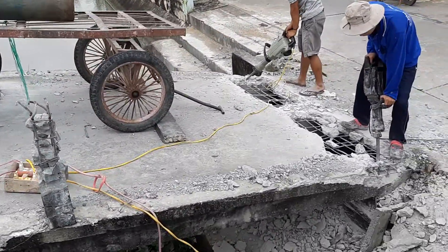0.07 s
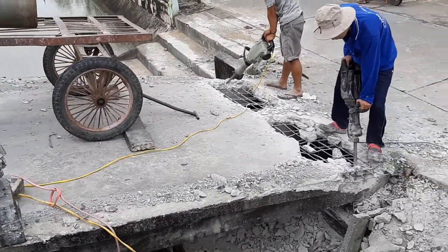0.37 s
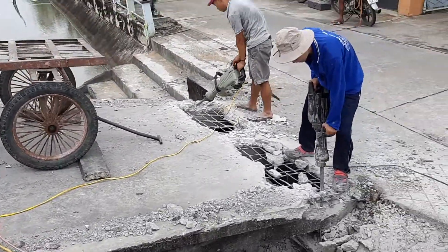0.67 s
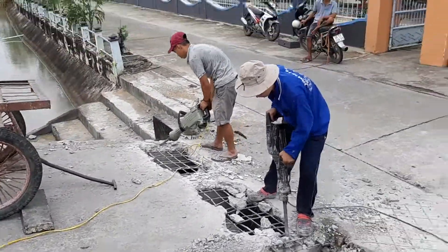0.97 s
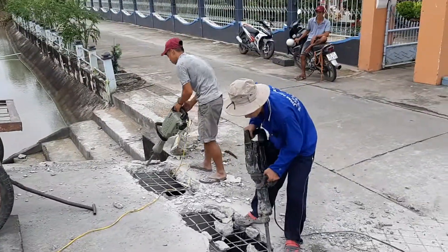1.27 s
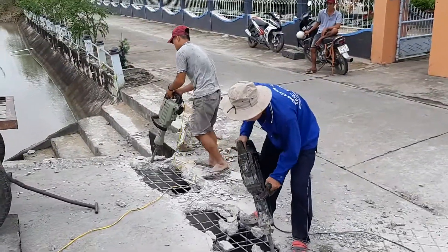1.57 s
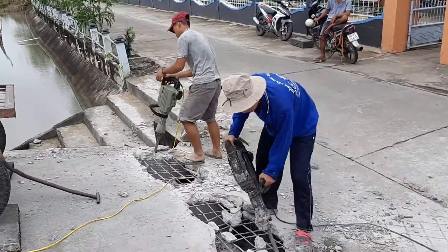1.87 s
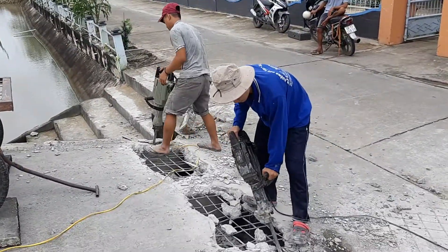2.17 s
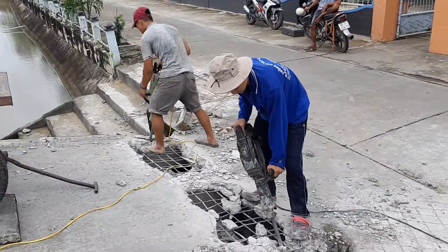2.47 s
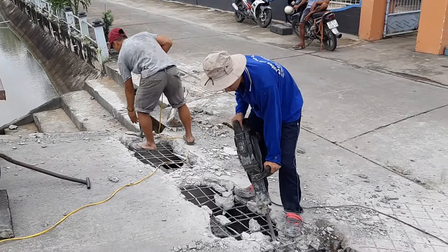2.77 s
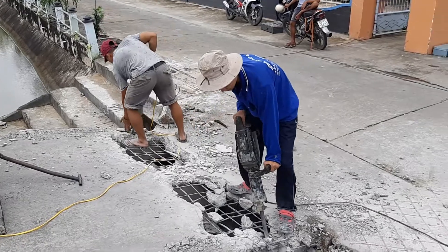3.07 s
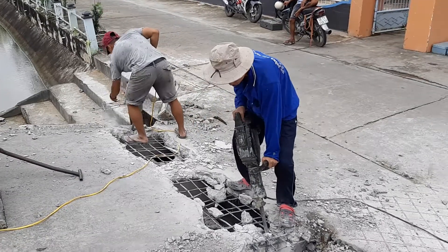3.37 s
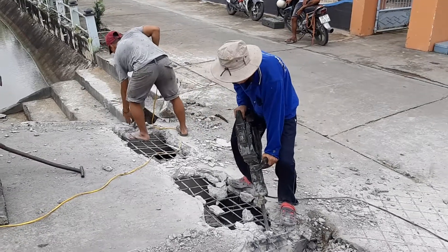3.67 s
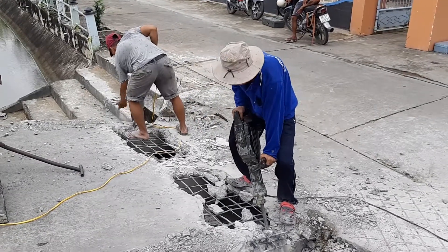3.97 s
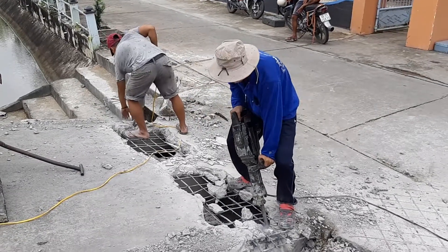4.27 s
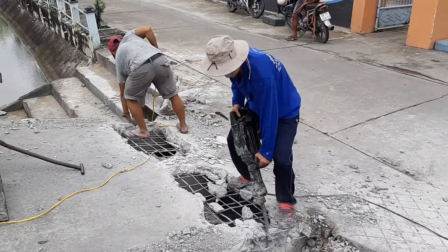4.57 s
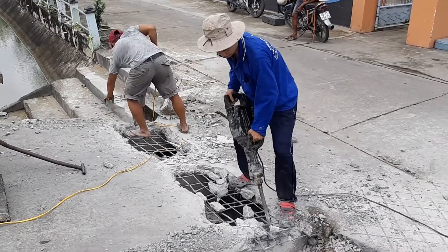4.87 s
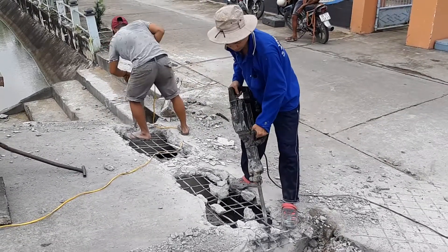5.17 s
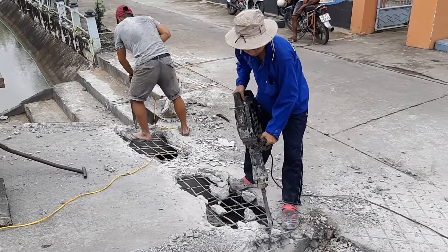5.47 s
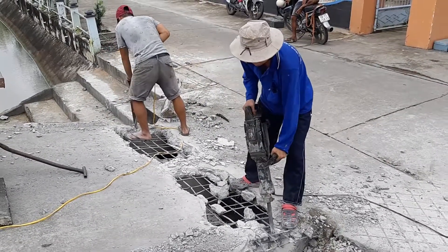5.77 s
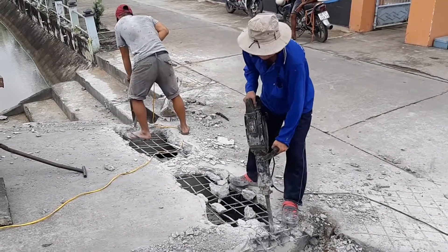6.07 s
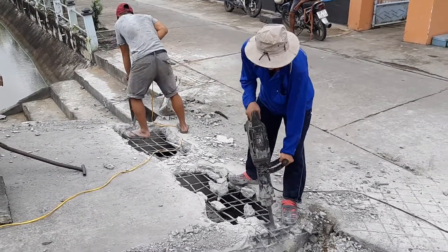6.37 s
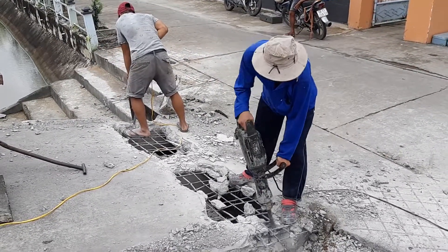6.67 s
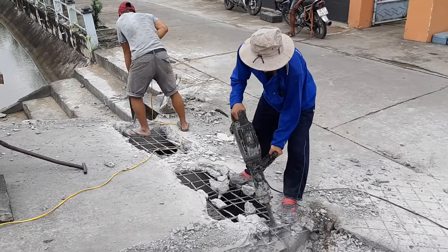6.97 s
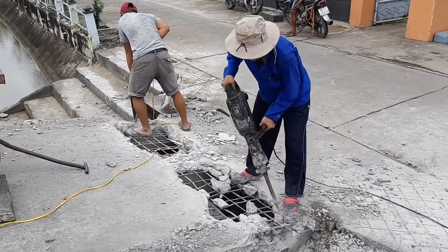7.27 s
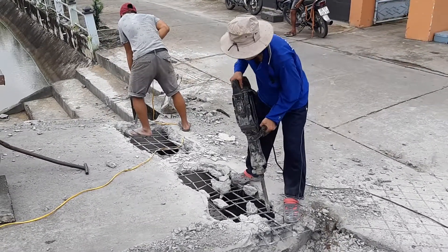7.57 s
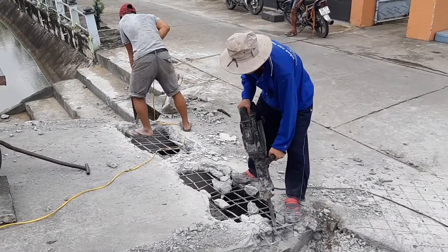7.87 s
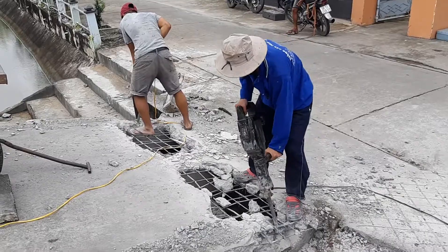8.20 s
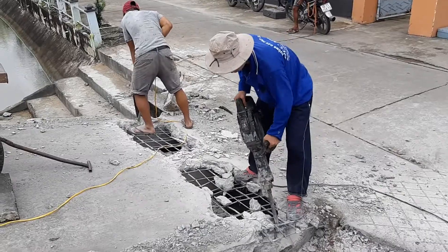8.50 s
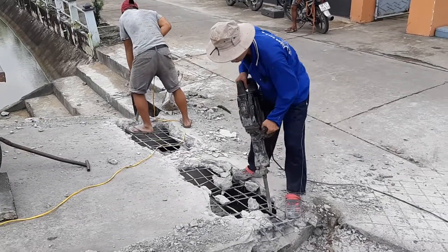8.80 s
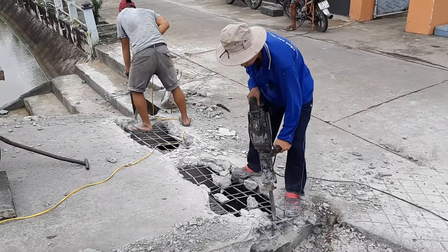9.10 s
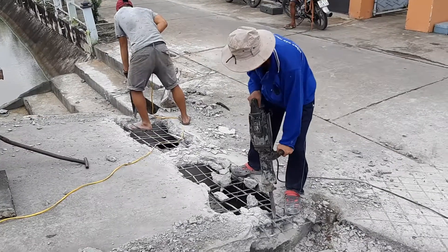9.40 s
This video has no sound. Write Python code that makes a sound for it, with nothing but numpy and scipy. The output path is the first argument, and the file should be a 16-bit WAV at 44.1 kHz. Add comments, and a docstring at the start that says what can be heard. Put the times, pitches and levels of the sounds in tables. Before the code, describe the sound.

Two handheld electric breakers, one near and one farther off, hammer a concrete slab with loud, rapid thuds, steel clanks and crunching grit. After a second the hammering drops to a light idle rattle, then the near tool pounds for about three seconds and idles again. The farther one takes over with an even beat while the near one adds two short bursts. Motors rush underneath, with a thin outdoor echo.

```python
"""Two handheld electric breakers chip a concrete slab beside a canal road, one near, one far.
Each blow thuds in slab and housing, clanks on the chisel and crushes grit; walls return a thin echo.
Both start together, concrete crumbling round the near tip. At 1 s the near tool is lifted and rattles
idly, at 1.9 s it hammers again, at 4.8 s it idles. From 5.8 s the far tool takes over and settles to an
even beat; the near one adds two short bursts, and at 8.6 s a grazed mesh bar rings."""
import sys
import numpy as np
from scipy import signal
from scipy.fft import rfft, irfft, next_fast_len
from scipy.io import wavfile

SR = 44100
rng = np.random.default_rng(int(sys.argv[2]) if len(sys.argv) > 2 else 0)


def wrap_up_sound(samples):
    """Save the sound to the file named by the first command line argument, as 16-bit audio."""
    columns = np.atleast_2d(samples).T
    # keep every value between -1 and 1, then stretch to whole-number steps
    tamed = np.clip(columns, -1, 1)
    steps = np.round(tamed * 32767).astype(np.int16)
    wavfile.write(sys.argv[1], SR, steps)


N = 425124
BLOW_SAMPLES = 8192
TIME, AGE = np.arange(N) / SR, np.arange(BLOW_SAMPLES) / SR
NEAR_LAG_SAMPLES, FAR_LAG_SAMPLES = 1.4, -5  # left behind right
DIRECT_SHARE = .52  # left-right likeness of direct treble, 0-1


def near_breaker():
    """Main tool: blows on slab and chisel, the tip creeping to a new spot every 0.25 s."""
    blows = near_blows()
    spots = np.floor(blows[:, 0] * 4)
    out = np.zeros((2, N))
    for spot in np.unique(spots):
        here = blows[spots == spot]
        out += near_thuds(here) + near_clanks(here)
    return out + grit(blows[:, 0], blows[:, 3], NEAR_LAG_SAMPLES)


# piston speed, per burst: t/s, rate/Hz
NEAR_SPEED = [
    [(0.019, 15.5), (0.18, 12.3), (0.23, 16.9), (0.51, 23.5), (0.68, 17.5), (0.96, 12.5)],
    [(1.855, 11.2), (1.98, 19.2), (2.13, 24.2), (2.44, 16.2), (2.6, 15.0), (2.69, 22.8), (3.09, 14.0),
     (3.24, 21.9), (3.54, 14.6), (3.66, 22.1), (4.12, 26.3), (4.25, 24.1), (4.31, 19.6), (4.8, 9.5)],
    [(6.31, 12.2), (6.48, 21), (6.74, 11.6), (6.88, 9.5), (7.08, 6.6)],
    [(8.119, 15.9), (8.23, 17.1), (8.47, 11.3)],
]
# ordinary blows, per burst: t/s, boom/dB, thud/dB, clank/dB, ring/dB, overtone/dB
NEAR_FORCE = [
    [(0, -19, -22, -22, -27, -44), (.23, -23, -26, -25.5, -27, -43), (.3, -21, -26, -31, -33, -43),
     (.48, -22, -24, -27, -24, -38), (.86, -38, -21, -20, -47, -45), (.94, -63, -55, -37, -59, -51)],
    [(1.85, -61, -26, -28, -30, -47), (2.08, -40, -20, -19.5, -37, -26),
     (2.36, -49, -19.5, -22.5, -30, -26), (2.7, -37, -19.5, -23, -48, -21),
     (2.85, -37, -24, -20.5, -26, -12), (3.25, -33, -21.5, -18, -28, -22),
     (3.36, -38, -20.5, -21.5, -34, -17), (3.7, -50, -19, -23.5, -43, -30),
     (3.92, -50, -25, -17.5, -25, -27), (4.3, -31.5, -23, -20.5, -37, -26), (4.78, -79, -15, -12, -42, -32)],
    [(6.31, -43, -31, -17.5, -18, -25), (6.44, -48, -54, -21.5, -17, -24), (6.49, -45, -40, -20, -20, -40),
     (6.58, -32, -30, -21, -23, -35), (6.74, -43, -37, -26, -31, -29), (6.93, -38, -28, -23, -24, -41),
     (7.06, -52, -47, -33, -45, -50)],
    [(8.12, -38, -28, -21, -21, -23), (8.24, -28, -26.5, -22.5, -25, -29), (8.45, -40, -23, -13, -35, -26)],
]
# hard bites and set-down knocks: t/s, boom/dB, thud/dB, clank/dB, ring/dB, overtone/dB
ACCENTS = [(0.2342, -20, -28, -23, -27, -41), (0.281, -31, -22.5, -26, -38, -44),
           (0.355, -45, -19, -22, -33, -42), (0.3923, -24, -21, -21, -30, -38),
           (0.4166, -31, -29, -22, -33, -42), (0.4819, -31, -21, -19, -21, -38),
           (0.6736, -35, -23, -22, -40, -40), (0.732, -33, -24.5, -21.5, -41, -42),
           (0.7938, -38, -23.5, -23, -48, -42), (0.8622, -42, -23.5, -23.5, -52, -45),
           (1.141, -62, -53, -47, -71, -64), (1.4808, -50, -55, -48, -73, -62),
           (1.6041, -68, -41, -36, -62, -58), (1.6666, -56, -36.5, -39, -63, -59),
           (1.6901, -58, -31.5, -27, -32, -36), (1.8555, -59, -28, -31, -30, -42),
           (1.929, -52, -26, -24, -28, -33), (2.4156, -37, -20.5, -20.5, -40, -23),
           (2.4762, -39, -21.5, -20, -24, -19), (2.541, -38, -20, -19, -27, -24),
           (2.799, -32, -21, -17, -35, -21), (2.905, -35, -22, -18, -19, -26),
           (2.962, -44, -22.5, -18.5, -22, -13), (3.0256, -50, -25, -18, -19, -17),
           (3.092, -45, -23, -16, -21, -22), (3.155, -39, -22, -17, -20, -14),
           (3.4088, -32, -22, -21, -22.5, -15), (3.4691, -42, -24.5, -19, -26, -19),
           (3.53, -38, -20.5, -19, -34, -34), (4.4155, -47, -28, -20, -48, -29),
           (4.475, -46, -26.5, -21, -45, -25), (4.5373, -55, -24.5, -19, -28, -26),
           (4.609, -56, -25, -16, -28, -26), (4.6902, -63, -28, -18, -22, -29),
           (4.7825, -72, -47, -32, -34, -35), (5.3086, -47, -41, -63, -72, -72),
           (5.5692, -65, -44, -40, -64, -57), (5.6367, -47, -39, -34.5, -61, -51),
           (5.682, -56, -35.5, -35.5, -63, -63), (6.6596, -32, -26, -20, -26, -27),
           (8.371, -50, -24, -19, -24, -30), (8.449, -39, -29, -18, -36, -28),
           (9.5897, -46, -27, -22, -21, -30)]
NEAR_SCATTER_DB = [2.5, 0.9, 1.2, 2, 2.5]  # per level column


def near_blows(same_blow_s=.006):
    """One blow per stroke, plus accents; an accent replaces a blow it coincides with."""
    regular, accents = strokes(NEAR_SPEED, NEAR_FORCE, NEAR_SCATTER_DB), np.array(ACCENTS)
    apart = np.abs(regular[:, :1] - accents[:, 0]).min(axis=1) > same_blow_s
    return np.vstack([regular[apart], accents])


# slab and housing modes: f/Hz, level/dB, t60/s, left-right/dB
NEAR_MODES = [(127, -15, 0.11, 4), (177, -16, 0.22, -1), (244.6, -2.5, 0.24, 1), (283, 0.5, 0.28, 1),
              (321, -6.5, 0.42, 4), (349, 1, 0.18, 4), (460.7, -3.5, 0.15, 4.5), (985, -8.5, 0.079, 18.5),
              (1118, -5.5, 0.11, -7), (1224, -2, 0.067, -2), (1393, -3.5, 0.026, 9), (1622, 0.5, 0.02, -6)]
# deep modes of the slab where it lies hollow: f/Hz, level/dB, t60/s, left-right/dB
HOLLOW_MODES = [(99, -15, .14, 7), (140.2, -6, 0.47, 2), (178.7, -1, 0.25, 0), (217.7, 4, 0.14, 2),
                (245.5, 5.5, 0.075, 0.5), (377, 3, 0.12, 0), (650, 3.5, 0.12, 3)]
# modes of the concrete plate under the tip: f/Hz, level/dB, t60/s, left-right/dB
PLATE_MODES = [(473.3, 4, 0.086, -2), (559, 4, 0.076, 3.5), (605.7, 6.5, 0.069, 0), (737, 2.5, 0.067, -1),
               (820, 4.5, 0.033, 0.5)]
# hollow knock of that plate: t/s, level/dB re slab and housing
KNOCK_LEVEL = [(0, -3), (.5, 5), (.9, -1.5), (1.9, 1), (2.1, 7.5), (2.35, 5.5), (2.6, 2.5), (3.1, 0.5),
               (3.7, -0.5), (4.1, 0.5), (4.7, -0.5), (9.6, 6)]


def near_thuds(blows):
    """On one spot: the plate knocks, the concrete gives with a thump, then the whole slab booms."""
    out = np.zeros((2, N))
    body = unit(slab(NEAR_MODES, travel_s=.0022, phase_rad=.5))
    boom = unit(slab(HOLLOW_MODES, travel_s=.00085, phase_rad=.28))
    plate = unit(slab(PLATE_MODES, travel_s=.002, phase_rad=.8, detune=.02, scatter_db=1.5))
    wave = bending_wave(start_hz=1158, spread_s=.01124, swell_s=.0037)
    thump = bending_wave(start_hz=377.6, spread_s=.072, swell_s=.0044)
    knock = unit(plate + undb(-3) * wave)
    ground = undb(-11) * shaken_ground(t60_s=.13)
    for t, boom_db, thud_db, *_ in blows:
        thud = unit(body + undb(along(KNOCK_LEVEL, t)[0]) * knock + ground)
        add(out, t, undb(thud_db - .97) * thud)
        add(out, t + .00281, undb(thud_db - 7.5) * thump)
        add(out, t + .00506, undb(boom_db) * boom)
    return out


# steel-on-concrete spectrum: f/Hz, level/dB
NEAR_STEEL = [(700, -24), (1300, -2), (1800, 0), (2600, -3), (3300, -3), (4000, 1.5), (4800, 4.5),
              (6000, -1.5), (7400, -2.5), (9000, -8.5), (10500, -3), (12200, -4.5), (13300, -9), (14200, 0),
              (15500, -14)]
# chisel bending modes, tip buried: f/Hz, level/dB, t60/s
BURIED_BENDING = [(998, -3.5, 0.059), (1100, -9, 0.058), (1783, 2, 0.038), (2260, -8, 0.049),
                  (3390, -4, 0.074), (4540, 2, 0.034), (6410, 3.5, .03), (6500, -18, 0.032),
                  (7100, -16, .03), (7850, -10, .03), (10400, 1, 0.068), (11100, 4, 0.033)]
# chisel and holder bending modes, tip free: f/Hz, level/dB, t60/s
FREE_BENDING = [(3700, -3, .04), (3880, -1, .05), (4070, 1, .06), (4250, -2, .04), (4410, 0, .05),
                (4535, -1, .05), (4728, -2, .06), (5020, -3, .05)]
# lengthwise chisel modes: f/Hz, level/dB, base t60/s
CHISEL_RING = [(4640, -4, .04), (4790, -3, .09), (4900, -5, .035), (5010, -4, .04), (5135, -5, .04),
               (7390, -2, .04), (7470, -1, .05), (7550, -4, .08)]
# their overtones: f/Hz, level/dB, base t60/s
CHISEL_OVERTONE = [(11600, -13, .03), (11800, -13, .04), (11980, -11, .07), (12150, -13, .04),
                   (12330, -11, .04), (13900, -13, .035), (14150, -14, .03), (15290, -5, .03),
                   (15370, -2, .04), (15425, 0, .075), (15490, -3, .04), (15570, -7, .03)]
# chisel seating: t/s, bending/dB re clank, lengthwise t60 factor
SEATING = [(0, -6.5, 0.43), (.9, 1.5, 0.34), (1.7, -23, 1.3), (2.3, -1.5, 0.94), (2.9, -2.5, 1.6),
           (3.5, -21, 1.2), (3.75, -17, .6), (4, -1.5, 0.68), (4.3, 0, 0.77), (4.6, -3, 1), (4.69, -11, 2),
           (4.78, -1, 4.1), (6.3, -6, 0.71), (6.55, -9.5, 1), (9.6, -5.5, 1.4)]


def near_clanks(blows, buried_until_s=1):
    """On one spot: the chisel clanks, bends and rings lengthwise as its seating allows."""
    out = np.zeros((2, N))
    steels = clanks(len(blows), NEAR_STEEL, NEAR_LAG_SAMPLES, crack_db=12, clatter_t60_s=.075,
                    rough_db=2.8, tail_db=-21, tail_t60_s=.081, ripple_db=3.5)
    for (t, _, _, clank_db, ring_db, overtone_db), steel in zip(blows, steels):
        bending_db, t60_factor = along(SEATING, t)
        bending = steel_bar(BURIED_BENDING if t < buried_until_s else FREE_BENDING, detune=.007)
        add(out, t, undb(clank_db) * (steel + undb(bending_db) * bending))
        add(out, t, undb(ring_db) * steel_bar(CHISEL_RING, t60_factor, detune=.005))
        add(out, t, undb(overtone_db) * steel_bar(CHISEL_OVERTONE, t60_factor, detune=.002))
    return out


# piston speed, per burst, hunting round 20 Hz under steady load: t/s, rate/Hz
FAR_SPEED = [
    [(.036, 14), (.12, 16.1), (.3, 15.7), (.56, 16)],
    [(5.812, 13.5), (5.94, 15.2), (6.01, 12.6), (6.27, 7), (6.38, 14), (6.55, 13), (6.58, 17.5),
     (7.2, 20.9), (7.23, 19.1), (7.74, 19.6), (7.78, 20.9), (8.38, 19.8), (8.72, 22.4), (8.75, 20.7),
     (9.49, 19.6), (9.65, 18)],
]
# blows, per burst: t/s, thud/dB, clank/dB
FAR_FORCE = [
    [(.03, -29, -22), (.17, -38, -25), (.35, -22.5, -18.5), (.54, -24, -21)],
    [(5.81, -31, -29.5), (5.89, -22, -20), (6.03, -22.5, -17), (6.22, -23, -21.5), (6.4, -22, -18.5),
     (7.05, -26.5, -21), (7.7, -26.5, -19), (8.25, -22, -19.5), (8.6, -26, -22), (9.05, -25, -24),
     (9.64, -24, -20.5)],
]
# slab and housing modes: f/Hz, level/dB, t60/s, left-right/dB
FAR_MODES = [(131, -21, 0.15, 1), (191, -12, 0.21, -7), (254.5, -3.5, 0.25, 2.5), (316.5, -5, 0.19, -1.5),
             (365, -2, 0.21, 1.5), (384, -9, 0.22, 3.5), (459, -3.5, 0.051, -2), (544, -12, 0.18, 3),
             (654, -5.5, 0.13, 0), (734, 0.5, 0.065, -0.5), (803, -6, 0.11, 4), (916, -9.5, 0.083, -8),
             (1027, -6, 0.065, -1), (1176, -1, 0.044, 1.5), (1242, -4.5, 0.051, -3.5),
             (1391, -7.5, 0.06, -3), (1596, -15.5, 0.048, -14)]
# steel-on-concrete spectrum: f/Hz, level/dB
FAR_STEEL = [(700, -11.5), (1300, 2.5), (1700, -1.5), (2500, 2), (3300, 5), (3950, 9), (5300, 6.5),
             (6400, -1.5), (7600, -7.5), (8300, 2), (9200, -8), (12500, -3), (15500, -7)]
# chisel bending modes: f/Hz, level/dB, t60/s
FAR_BENDING = [(1210, -2.5, 0.062), (1292, 2.5, 0.036), (2684, 5.5, 0.037), (3754, 2.5, 0.035),
               (3880, 10.5, 0.031), (5350, -3.5, 0.11), (6200, -2, 0.067), (8530, -2.5, 0.07)]


def far_breaker():
    """Firmly seated: the striker launches with a rasp, thump and tick, then lands with thud and clank."""
    out = np.zeros((2, N))
    lag, rasp_s = FAR_LAG_SAMPLES, .005
    rasp_colour = [(300, -10), (1300, 6.5), (2500, -4), (4500, -1), (15500, -28)]  # f/Hz, level/dB
    swell = np.exp(-(AGE / rasp_s - 2) ** 2)
    thump = bending_wave(start_hz=519, spread_s=.031, swell_s=.0036)
    ground = shaken_ground(t60_s=.2)
    blows = strokes(FAR_SPEED, FAR_FORCE, scatter_db=[1.1, 1])
    steels = clanks(len(blows), FAR_STEEL, lag, crack_db=4, clatter_t60_s=.042,
                    rough_db=3.2, tail_db=-24, tail_t60_s=.26, ripple_db=3)
    for (t, thud_db, clank_db), steel in zip(blows, steels):
        body = unit(slab(FAR_MODES, travel_s=.0018, phase_rad=.45, detune=.006, scatter_db=1.2))
        rasp = unit(swell * noise(rasp_colour, BLOW_SAMPLES, lag))
        bending = steel_bar(FAR_BENDING, detune=.014, lag=lag)
        add(out, t - 3 * rasp_s, undb(clank_db - 17) * rasp)
        add(out, t - .00371, undb(thud_db - 6.5) * thump)
        add(out, t - .0037, undb(clank_db - 19.5) * tick(GRIT_COLOUR, lag, t60_s=.027))
        add(out, t, undb(thud_db - .44) * body)
        add(out, t, undb(thud_db - 13) * (ground + shaken_ground(t60_s=.09)))
        add(out, t, undb(clank_db) * (undb(-.94) * steel + undb(-6.5) * bending))
    return out + grit(blows[:, 0], blows[:, 2], lag)


def strokes(speeds, forces, scatter_db):
    """One blow per crank turn, no two equally hard; rows of t/s, levels/dB."""
    rows = []
    for speed, force in zip(speeds, forces):
        t = np.arange(speed[0][0], speed[-1][0], 1 / SR)
        turns = np.cumsum(along(speed, t)[0]) / SR
        times = np.interp(np.arange(turns[-1]), turns, t)
        chance = rng.standard_normal((len(times), len(scatter_db)))
        rows.append(np.column_stack([times, along(force, times).T + chance * scatter_db]))
    return np.vstack(rows)


def clanks(count, colour, lag, crack_db, clatter_t60_s, rough_db, tail_db, tail_t60_s, ripple_db):
    """Steel on concrete: crack, clatter of grit, faint ring; part repeats, part is freshly crushed."""
    def strike():
        clatter = roughness(rough_db, step_samples=48) * fade(clatter_t60_s)
        shape = undb(crack_db) * fade(.0016) + clatter + undb(tail_db) * fade(tail_t60_s)
        bite = 1 - np.exp(-AGE / .0005)
        steel = noise(colour, BLOW_SAMPLES, lag, alike_hz=900, ripple_db=ripple_db, direct=DIRECT_SHARE)
        return unit(steel * shape * bite)

    repeated = strike()
    return [.5 * repeated + .87 * strike() for _ in range(count)]


def steel_bar(modes, t60_factor=1, detune=.00079, lag=NEAR_LAG_SAMPLES):
    """A struck bar's modes, slightly different at each seating."""
    out = 0
    age = AGE - np.array([[lag / SR], [0]])
    for hz, db, t60_s in modes:
        pitch, size, skew = rng.standard_normal(3)
        cycles = hz * (1 + detune * pitch) * age + rng.random()
        phase = 2 * np.pi * cycles + np.array([[.6 * skew], [0]])
        out = out + undb(db + 2 * size) * fade(t60_s * t60_factor) * np.sin(phase)
    return unit(out)


def slab(modes, travel_s, phase_rad, detune=0., scatter_db=0.):
    """Slab bending modes; low waves travel slowly and arrive late. Right trails by up to phase_rad."""
    out = np.zeros((2, BLOW_SAMPLES))
    for (hz, db, t60_s, pan_db), (pitch, size) in zip(modes, rng.standard_normal((len(modes), 2))):
        age = AGE - travel_s * max(np.sqrt(1700 / hz) - 1, 0)
        swell = np.clip(age * hz, 0, 1) * fade(t60_s, age) / np.sqrt(t60_s)
        trail = np.array([[0], [phase_rad * min(hz / 400, 1)]])
        phase = 2 * np.pi * hz * (1 + detune * pitch) * age - trail
        gain = undb(db + scatter_db * size + np.array([[pan_db], [-pan_db]]) / 2)
        out += gain * swell * np.sin(phase)
    return out


def bending_wave(start_hz, spread_s, swell_s):
    """First wave through the concrete: a falling chirp, as highs outrun lows."""
    phase = 2 * np.pi * np.cumsum(start_hz / (1 + AGE / spread_s) ** 2) / SR
    swell = AGE / swell_s * np.exp(-AGE / swell_s)
    return unit(swell * np.sin(phase - np.array([[0], [.4]])))


# shaken-ground spectrum: f/Hz, level/dB
GROUND_COLOUR = [(25, -45), (55, -64), (90, -53), (130, -19), (200, 14.5), (350, 14), (700, -6), (1200, 2),
                 (2000, -5.5), (4000, -45)]


def shaken_ground(t60_s):
    """Many weak ground modes, merged into dull noise."""
    return unit(noise(GROUND_COLOUR, BLOW_SAMPLES, alike_hz=696) * (fade(t60_s) - fade(.033)))


# piston puff: t/s, level/dB
PUFF_LEVEL = [(0, -25), (.35, -36), (.9, -32), (1.85, -39), (2.05, -22.5), (2.4, -28.5), (2.8, -23.5),
              (3.2, -43), (3.6, -35), (4, -26), (4.3, -23.5), (4.7, -64), (6.3, -27.5), (7, -57),
              (8.2, -33)]
# puff spectrum: f/Hz, level/dB
PUFF_COLOUR = [(60, -50), (500, -36), (1500, -5), (2500, -2), (3500, 6.5), (4700, 1.5), (5600, -6),
               (8000, -10), (15500, -17)]


def piston(lead_s=.0065, width_s=.007):
    """Under load, each forward stroke of the near piston rattles and puffs just before the blow."""
    out = np.zeros((2, N))
    swell = np.exp(-(AGE / width_s - 2) ** 2)
    for t in strokes(NEAR_SPEED, NEAR_FORCE, NEAR_SCATTER_DB)[:, 0]:
        rattle = roughness(4, step_samples=64)
        air = noise(PUFF_COLOUR, BLOW_SAMPLES, NEAR_LAG_SAMPLES,
                    alike_hz=1000, ripple_db=7.5, direct=DIRECT_SHARE)
        add(out, t - lead_s - 2 * width_s, undb(along(PUFF_LEVEL, t)[0]) * unit(swell * rattle * air))
    return out


# crumbling concrete: t/s, level/dB
CRUMBLE_LEVEL = [(0, -27), (.2, -30), (.33, -21), (.5, -27.5), (.7, -28.5), (.88, -46), (.97, -56)]
# chip spectrum: f/Hz, level/dB
CHIP_COLOUR = [(60, -45), (400, -23), (1000, 4), (1800, 2), (2800, -4), (4400, 4.5), (5600, -8), (6700, 6),
               (7800, -3), (9000, -19), (10500, 1), (15500, -16)]


def crumbling(chips_per_s=310, scatter_db=.5, t60_s=.015):
    """Chips crack off round the buried tip in a dense, uneven crunch."""
    out = np.zeros((2, N))
    start, end = CRUMBLE_LEVEL[0][0], CRUMBLE_LEVEL[-1][0]
    decay = fade(t60_s, AGE[:1024])
    for t in rng.uniform(start, end, int(chips_per_s * (end - start))):
        chip = decay * noise(CHIP_COLOUR, len(decay), NEAR_LAG_SAMPLES, ripple_db=4, direct=DIRECT_SHARE)
        add(out, t, undb(scatter_db * min(rng.standard_normal(), 2)) * chip)
    return out / out[:, :int(end * SR)].std() * undb(along(CRUMBLE_LEVEL, TIME)[0])


# cracking-grit spectrum: f/Hz, level/dB
GRIT_COLOUR = [(200, -28), (900, -2.5), (1700, 0.5), (2600, -6.5), (4000, 5), (5300, 2), (7000, -11),
               (15500, -13)]


def grit(times, clanks_db, lag, grains=4, spread_s=.05, scatter_db=5.5):
    """After each blow a few grains crack and skip under the tip."""
    out = np.zeros((2, N))
    for t, clank_db in zip(times, clanks_db):
        for late, size in zip(rng.random(grains), np.minimum(rng.standard_normal(grains), 2)):
            grain = tick(GRIT_COLOUR, lag, t60_s=.014)
            add(out, t + late * spread_s, undb(clank_db - 21 + scatter_db * size) * grain)
    return out


# reinforcing-bar modes: f/Hz, level/dB, t60/s
MESH_MODES = [(4820, -1, .05), (5400, -3, .4), (5800, -7, .55)]


def mesh_bar(at_s=8.563, level_db=-33):
    """A bared mesh bar, grazed once, rings on through a few blows."""
    out = np.zeros((2, N))
    add(out, at_s, undb(level_db) * steel_bar(MESH_MODES))
    return out


# loose-chisel taps: t/s, relative level/dB, ring f/Hz
IDLE_TAPS = [(0.9344, -18, 4150), (0.997, -27, 4230), (1.06, -26, 3890), (1.0894, -33, 3990),
             (1.1123, -27, 4560), (1.133, -26, 3320), (1.1862, -26, 4500), (1.235, -23, 4110),
             (1.2938, -26, 4100), (1.398, -28, 4540), (1.456, -29, 3520), (1.647, -25, 4020),
             (4.8692, -29, 4050), (4.883, -25, 4200), (4.9351, -31, 3940), (5.022, -29, 4250),
             (5.0754, -30.5, 4020), (5.1516, -32, 4300), (5.169, -26.5, 4250), (5.2576, -29, 3870),
             (5.319, -29, 4500), (5.3691, -36, 3950), (5.415, -34, 3080), (5.5167, -37, 4560),
             (5.546, -31, 4560), (5.846, -21.5, 4230)]
# tap spectrum: multiple of ring f, level/dB
TAP_COLOUR = [(.15, -28), (.4, -7), (.8, -7), (1, 7.5), (1.2, -8.5), (1.5, -18), (3.5, -36)]


def loose_chisel(gain_db=-14, bounce_s=.012, bounce_db=-4):
    """The unloaded chisel taps its holder and bounces twice, weaker each time."""
    out = np.zeros((2, N))
    for t, db, hz in IDLE_TAPS:
        colour = np.array(TAP_COLOUR) * [hz, 1]
        for bounce, gap in enumerate(.5 + rng.random(size=3)):
            tap = tick(colour, NEAR_LAG_SAMPLES, t60_s=.033)
            add(out, t, undb(db + gain_db + bounce * bounce_db) * tap)
            t += gap * bounce_s
    return out


# piston speed of the lifted near tool, per pause: t/s, rate/Hz
IDLE_SPEED = [
    [(0.925, 14.2), (1.1, 15.2), (1.2, 18.8), (1.42, 18), (1.49, 15.4), (1.84, 18.3)],
    [(4.795, 14.1), (5.56, 15.3)],
]
# idle air, per pause: t/s, puff/dB, relative rush/dB
IDLE_LEVEL = [
    [(.93, -38.5, -37), (1.4, -40, -40.5), (1.82, -40.5, -42)],
    [(4.8, -40, -41), (5.15, -43.5, -68), (5.55, -45, -64)],
]
# vent spectrum: f/Hz, level/dB
VENT_COLOUR = [(50, -45), (200, -22), (450, -23), (590, 11.5), (760, -9), (1100, -9), (1550, -1),
               (2100, -4.5), (3200, 2.5), (4400, 0), (5200, -3), (6000, -14), (9000, -17), (15500, -39)]


def idling():
    """Unloaded, the striker only ticks; each stroke pushes a rattling puff out of the vents."""
    out = np.zeros((2, N))
    puffs = strokes(IDLE_SPEED, IDLE_LEVEL, scatter_db=[.6, 0])
    periods_s = np.minimum(np.diff(puffs[:, 0], append=np.inf), .08)
    for (t, db, _), period_s in zip(puffs, periods_s):
        swell = np.exp(-np.abs((AGE / period_s - .38) / .48) ** 3)
        shape = swell * roughness(2.6, step_samples=128) + .86 * fade(.028)
        vent = np.array(VENT_COLOUR) * [np.exp(.056 * rng.standard_normal()), 1]  # wavering hoot
        air = noise(vent, BLOW_SAMPLES, NEAR_LAG_SAMPLES, alike_hz=2670, ripple_db=3)
        add(out, t, undb(db) * shape * air)
    return out


# motor, gear and cooling-air spectrum: f/Hz, level/dB
MOTOR_COLOUR = [(30, -44), (80, -33), (150, -7.5), (300, 5), (600, 3), (1000, -0.5), (2200, 0), (3300, 5.5),
                (4500, 3.5), (5300, -1), (6200, -2), (9000, -8), (12000, -2), (15500, -3.5)]


def motors(near_db=-22.5, far_db=-31, floor_db=-51.5, rated_hz=20, db_per_octave=5, follow_s=.0075):
    """Brushes, gears and fans rush, louder with speed, easing off as a burst ends; levels relative."""
    power = np.full(N, undb(floor_db) ** 2)
    for speeds, rated_db, ease_s in (NEAR_SPEED, near_db, .37), (FAR_SPEED, far_db, .02):
        for speed in speeds:
            octaves = np.log2(along(speed, TIME)[0] / rated_hz)
            load = np.clip((speed[-1][0] - TIME) / ease_s, 0, 1)
            power += running(speed) * load * undb(rated_db + db_per_octave * octaves) ** 2
    for pause in IDLE_LEVEL:
        power += running(pause) * undb(along(pause, TIME)[1]) ** 2
    pole = np.exp(-1 / (follow_s * SR))
    gain = signal.lfilter([1 - pole], [1, -pole], np.sqrt(power), zi=[undb(near_db)])[0]
    knots = TIME[::200]
    flutter_db = 5 * np.interp(TIME, knots, np.clip(rng.standard_normal(len(knots)), -2, 1.7))
    rush = noise(MOTOR_COLOUR, next_fast_len(N), alike_hz=2020)[:, :N]
    rush = signal.sosfilt(signal.butter(2, 70, "high", fs=SR, output="sos"), rush)
    return gain * undb(flutter_db - 6) * rush


def running(curve, spin_up_s=.15):
    """Motor power, 0-1: runs up before the curve's first point, stops at its last."""
    return np.clip(1 + (TIME - curve[0][0]) / spin_up_s, 0, 1) ** 2 * (TIME <= curve[-1][0])


def street_echo(x, wet_db, t60_s):
    """Thin diffuse echo from walls and canal bank."""
    age = np.arange(SR // 2) / SR
    colour = [(60, -17), (300, -16), (4000, -16.5), (15000, -20.5)]  # f/Hz, level/dB
    echo = noise(colour, len(age), alike_hz=605) * fade(t60_s, age - .014)
    echo /= np.sqrt(np.sum(echo ** 2) / 2)
    return undb(wet_db) * signal.fftconvolve(x, echo, axes=1)[:, :N]


def tick(colour, lag, t60_s):
    """Short noise tick with a ring of its own."""
    ring = noise(colour, 2048, lag, alike_hz=1000, ripple_db=3.5, direct=DIRECT_SHARE)
    return unit(ring * fade(t60_s, AGE[:2048]))


def noise(colour, size, lag=0, alike_hz=1500, ripple_db=0, direct=0):
    """Stereo noise, rms 1, with random ripple; alike in the bass, in the treble by its direct share."""
    hz = np.arange(size // 2 + 1) * SR / size + 1
    points_hz, db = np.transpose(colour)
    ripple = np.interp(hz, np.linspace(0, SR / 2, num=200), rng.standard_normal(200))
    gain = undb(np.interp(np.log(hz), np.log(points_hz), db) + ripple_db * ripple)
    alike = np.minimum(direct + (1 - direct) / (1 + (hz / alike_hz) ** 2), 1)
    mid, side = rfft(rng.standard_normal((2, size))) * gain * np.sqrt([1 + alike, 1 - alike])
    delay = np.exp(-2j * np.pi * hz * lag / SR)
    x = irfft(np.array([(mid + side) * delay, mid - side]), size)
    return x / x.std()


def roughness(depth_db, step_samples):
    """Random gain flicker over one blow."""
    knots = AGE[::step_samples]
    return undb(depth_db * np.interp(AGE, knots, rng.standard_normal(len(knots))))


def along(curve, t):
    """A curve's columns at times t."""
    times, *columns = np.transpose(curve)
    return np.array([np.interp(t, times, column) for column in columns])


def fade(t60_s, age=AGE):
    """Exponential decay from age zero."""
    return np.exp(-np.log(1000) * np.maximum(age, 0) / max(t60_s, 1e-4)) * (age >= 0)


def unit(x):
    """Scale to the energy of 20 ms at rms 1."""
    return x / np.sqrt(np.sum(x ** 2) / 2 / (SR / 50))


def undb(db):
    """Decibels to gain."""
    return 10 ** (np.asarray(db) / 20)


def add(out, t, x):
    """Mix stereo x in at time t."""
    start = int(round(t * SR))
    a, b = max(start, 0), min(start + x.shape[1], N)
    if b > a:
        out[:, a:b] += x[:, a - start:b - start]


def scene():
    """Both tools in the open street."""
    tools = near_breaker() + piston() + crumbling() + far_breaker()
    tools += mesh_bar() + idling() + loose_chisel()
    return tools + street_echo(tools, wet_db=-14.5, t60_s=.45) + motors()


def record(dry, low_hz=55, top_hz=15900):
    """Phone microphones: right slightly hotter, deep bass thinned, highest peaks rounded, top cut."""
    ports = dry * undb(np.array([[-.4], [.4]]))
    ports = signal.sosfilt(signal.butter(1, low_hz, "high", fs=SR, output="sos"), ports)
    rounded = ports / (1 + ports ** 6) ** (1 / 6)
    return signal.sosfilt(signal.ellip(10, .2, 80, top_hz, fs=SR, output="sos"), rounded)


dry = scene()
out = record(dry)
wrap_up_sound(out)
```